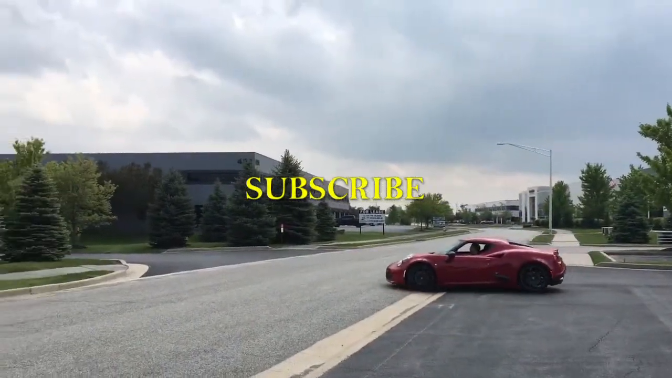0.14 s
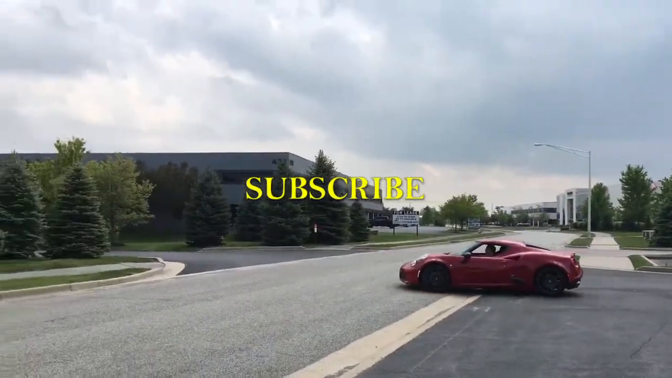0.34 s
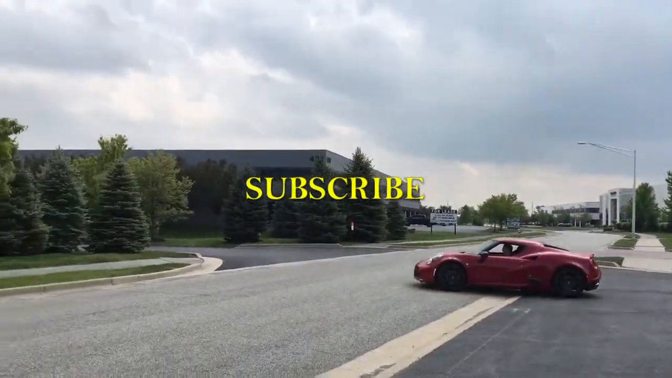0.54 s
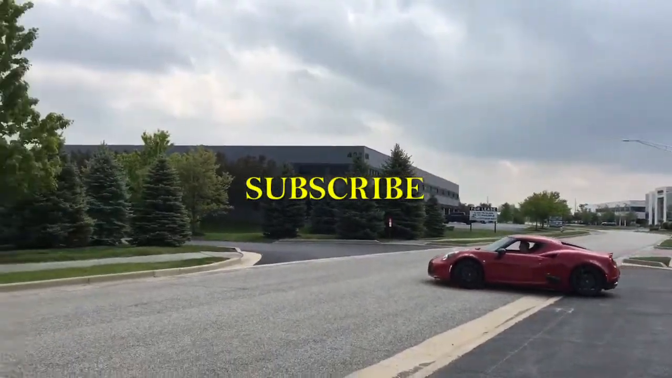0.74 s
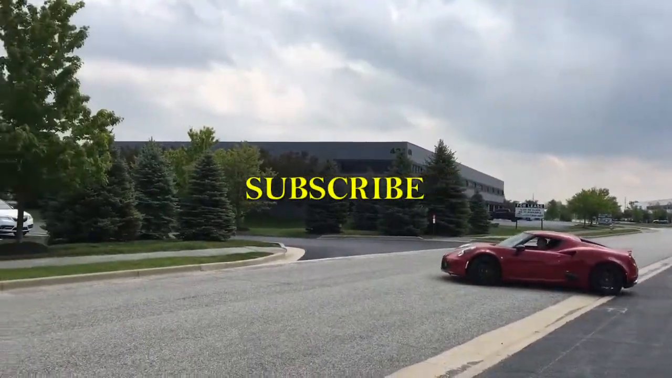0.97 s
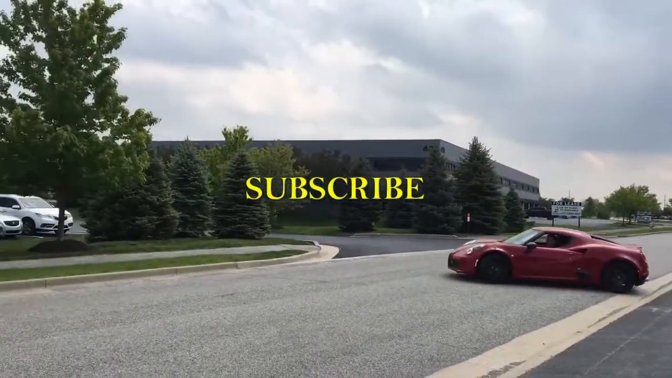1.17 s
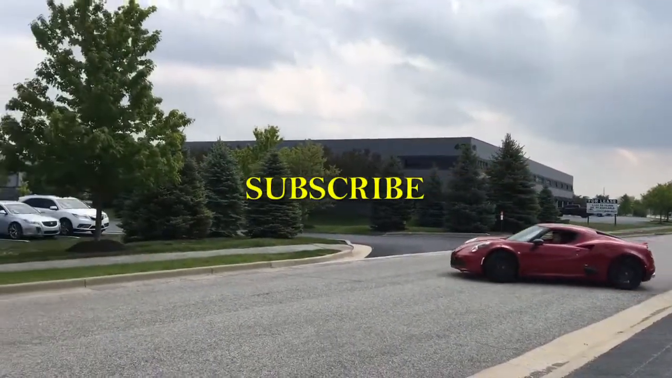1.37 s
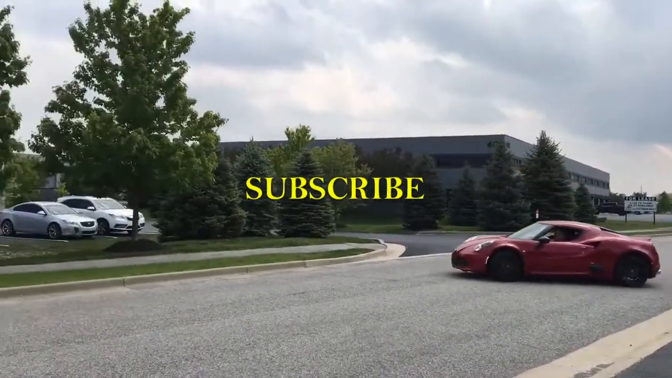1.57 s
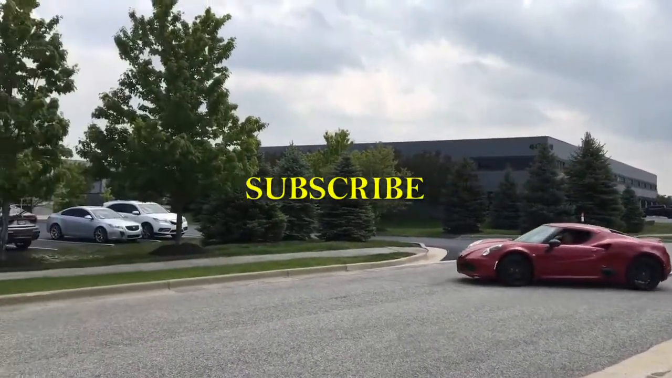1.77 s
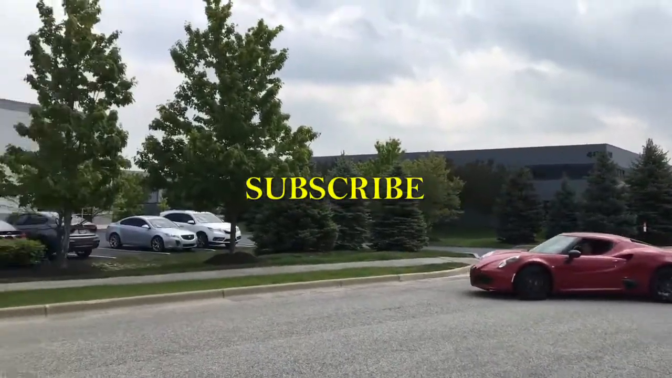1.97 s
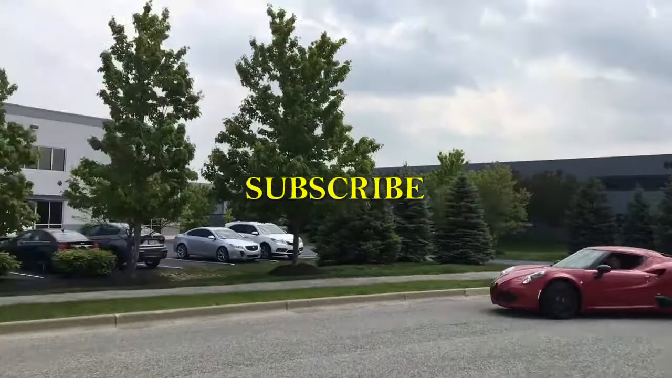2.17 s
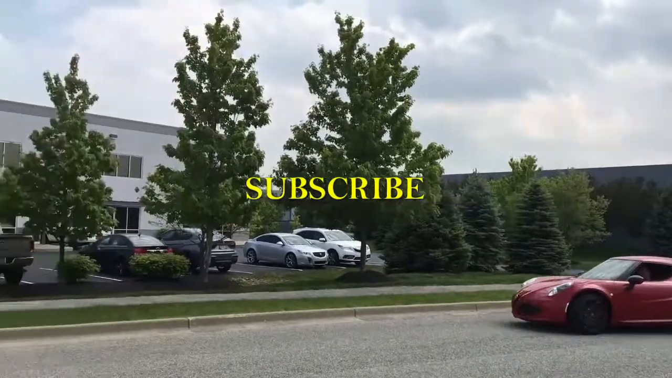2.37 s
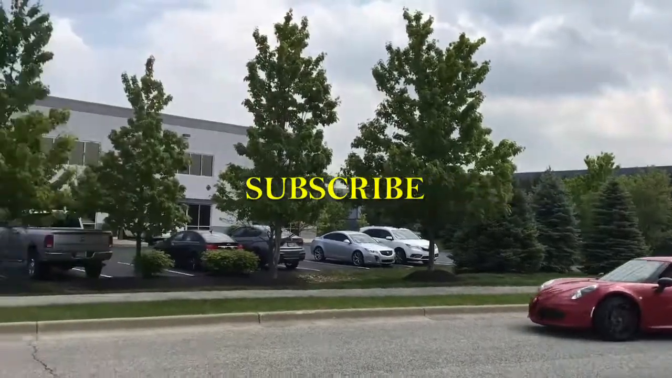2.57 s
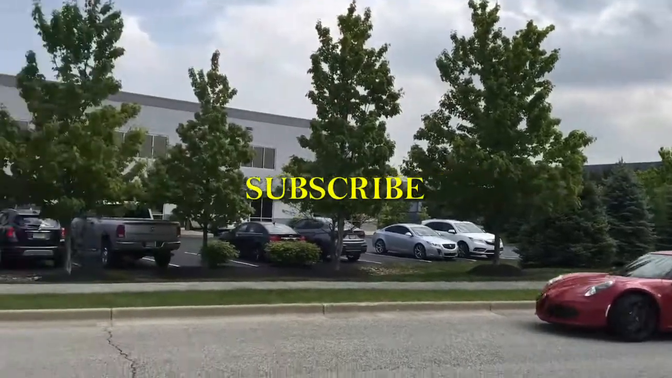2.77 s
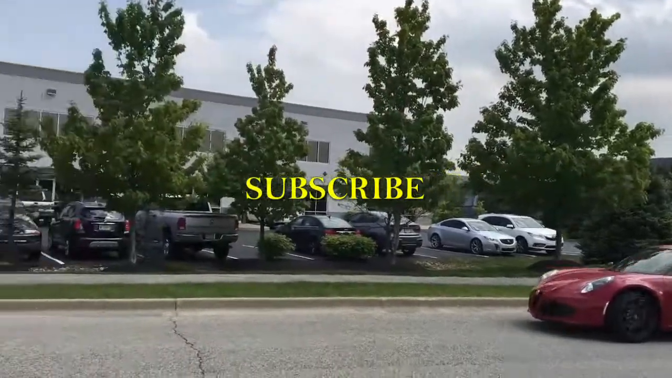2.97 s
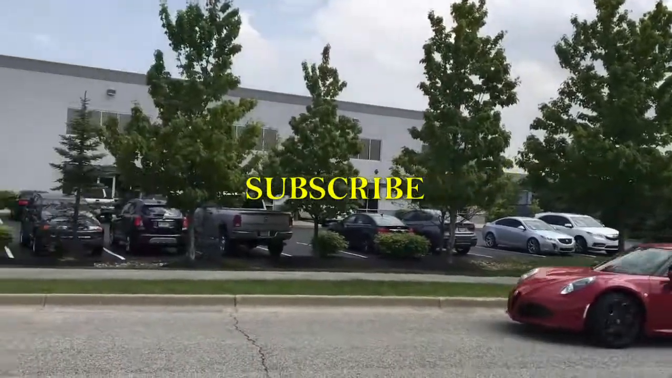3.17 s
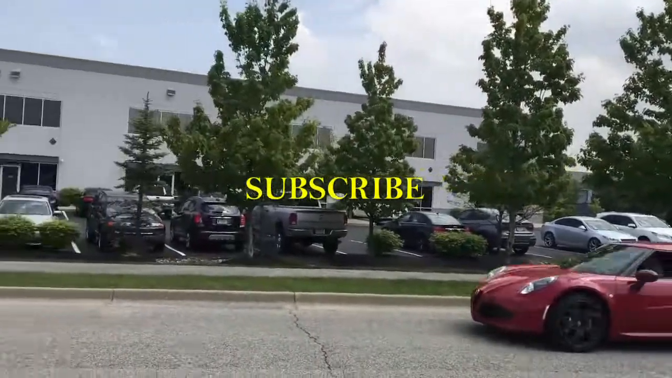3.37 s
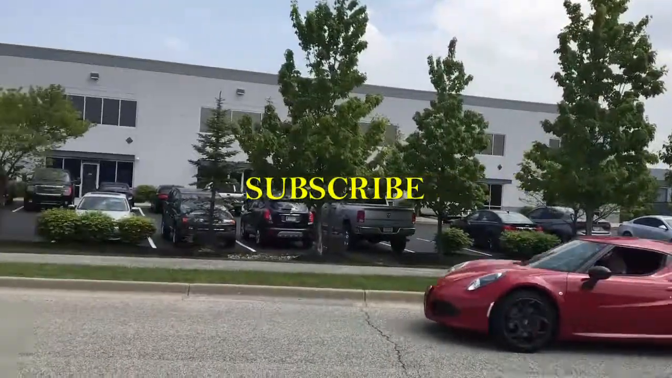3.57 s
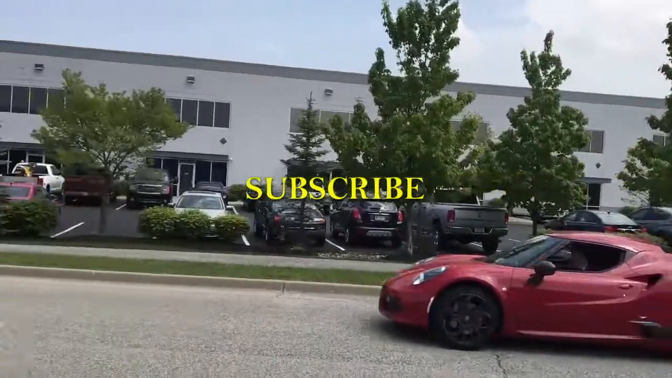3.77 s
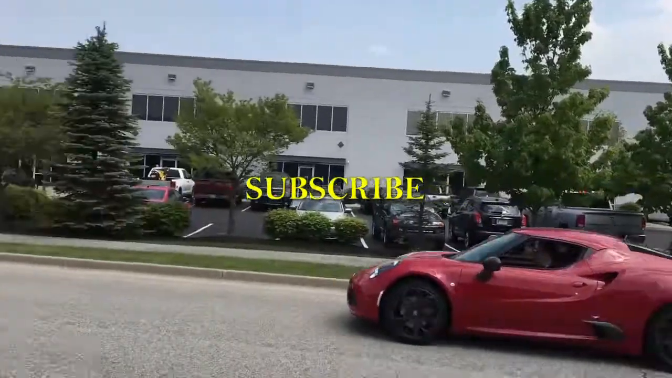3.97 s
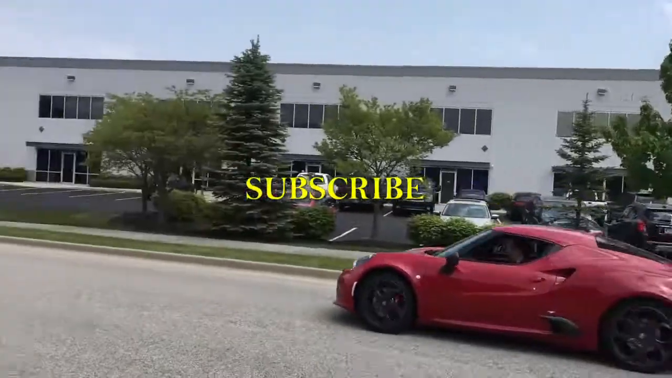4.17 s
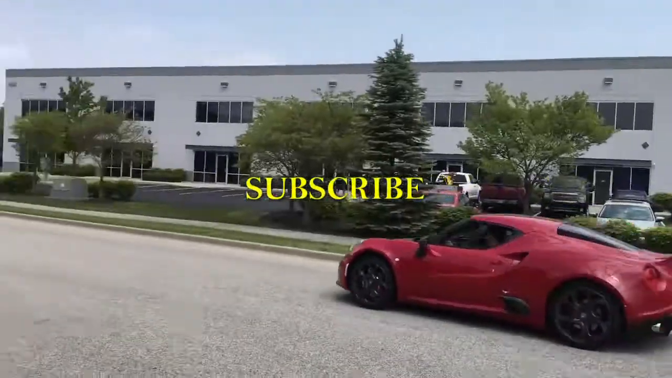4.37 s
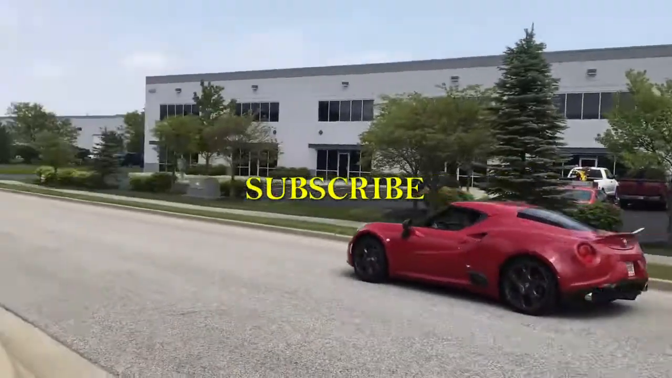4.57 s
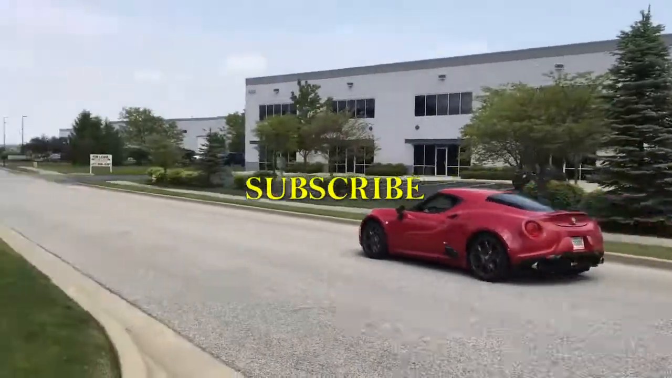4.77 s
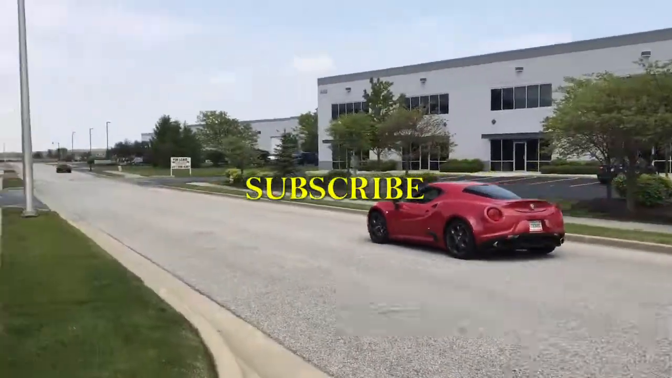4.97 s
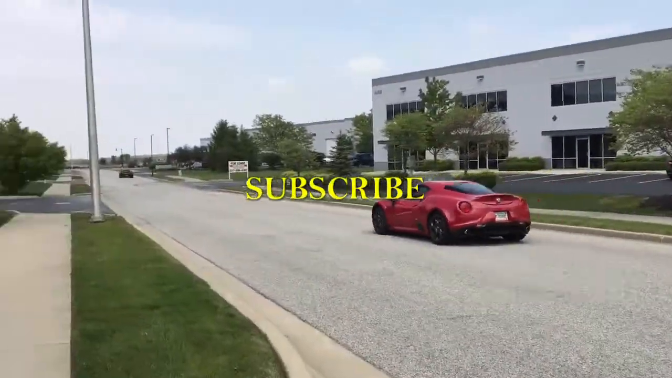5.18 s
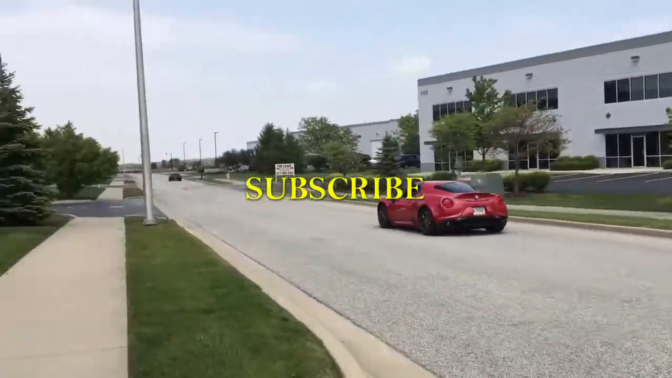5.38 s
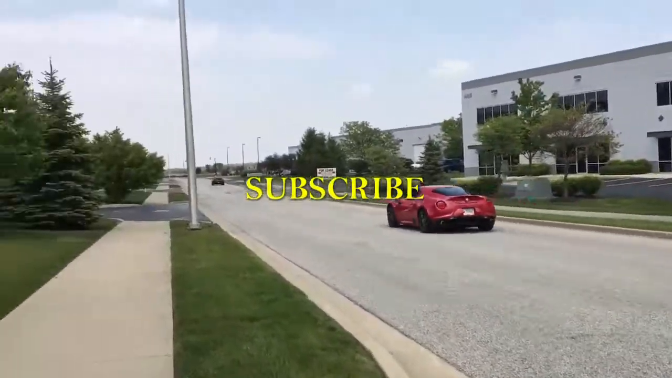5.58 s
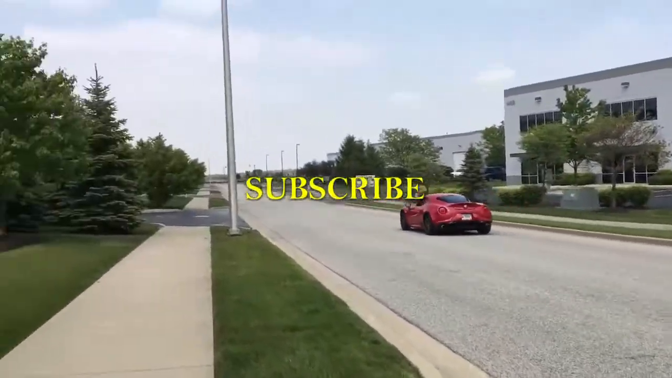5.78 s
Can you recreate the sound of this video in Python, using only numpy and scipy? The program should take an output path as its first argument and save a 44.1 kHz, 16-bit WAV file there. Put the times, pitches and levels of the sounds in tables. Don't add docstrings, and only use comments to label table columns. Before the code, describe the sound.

Outdoor roadside, handheld microphone, about six seconds. At first a sports car's low, lumpy four-cylinder burble sits at moderate distance, with a second car's wavering drone far down the road, throbbing most around 1.4-1.8 s and fading by about 4.5 s. A loose shield buzzes briefly near 0.7 s; a few tiny bright grit ticks snap at 1.15-1.3 s. The engine climbs steadily through first gear, growing smoother, with shell clatter, tyre roar and faint turbo whistle. From 3.5 s it swells abruptly, loudest and raspiest close by near 4 s. At 4.26 s the gear shift cuts in: a rough, half-speed stuttering bark with a low thump, falling in pitch and dying by 4.55 s. After a short dip, second gear pulls from about 4.8 s with airy turbo hiss and a rising, hoarse exhaust still going at the end. Building echoes slightly thicken it; low wind rumble peaks near 4.9 s, then calms.

```python
import sys
import numpy as np
from scipy import signal
from scipy.fft import rfft, irfft, next_fast_len
from scipy.io import wavfile
from scipy.ndimage import uniform_filter1d

SR = 44100
rng = np.random.default_rng(int(sys.argv[2]) if len(sys.argv) > 2 else 0)


def amplitude_ratio(level_db):
    exponent = np.asarray(level_db, float) / 20
    return 10 ** exponent


def put_to_file(sound):
    columns = np.atleast_2d(sound).T
    safe = np.clip(columns, -1, 1)
    whole_steps = np.round(safe * 32767)
    wavfile.write(sys.argv[1], SR, whole_steps.astype(np.int16))


N = 257103

# (frequency [Hz], level [dB])
PIPE = [(60, 0.5), (130, 0.5), (200, 0), (295, 7), (340, -4), (420, -3.5), (520, -1), (600, 4), (680, 0.5),
        (760, -23.5), (880, -17), (1040, -17.5), (1300, -26.5), (1900, -35.5)]
# (frequency [Hz], width [Hz], level [dB])
SHELL = [(878, 160, 2), (1057, 140, -3.5), (1173, 56, -3), (1329, 47, -2), (1416, 91, 0), (1590, 34, -1.5),
         (1883, 66, -3), (2077, 110, -2), (2338, 97, -6.5), (3166, 59, -23.5)]
CUT_S = 4.26
BOOST_S = 4.78


def evened(x):
    return x / np.sqrt(np.mean(abs(x) ** 2) + 1e-20)


def read(points, hz):
    f, value = np.transpose(points)
    return np.interp(np.log(hz + 1), np.log(f + 1), value)


def played(rows):
    s, *columns = np.transpose(rows)
    return [np.interp(np.arange(N) / SR, s, column) for column in columns]


def ramp(start, length):
    u = np.clip((np.arange(N) / SR - start) / length, 0, 1)
    return u * u * (3 - 2 * u)


def bump(s, length, size=1):
    return np.exp(-0.5 * ((np.arange(0, N, size) / SR - s) / length) ** 2)


def coloured(points, gate=1):
    size = next_fast_len(N)
    spectrum = rfft(gate * rng.standard_normal(N), size)
    spectrum *= amplitude_ratio(read(points, np.fft.rfftfreq(size, 1 / SR)))
    return evened(irfft(spectrum, size)[:N])


def drift(hz, count=N):
    rate = 400
    steps = int(N / SR * rate) + 2
    slow = signal.lfilter([1], [1, -np.exp(-2 * np.pi * hz / rate)], rng.standard_normal(steps))
    return evened(np.interp(np.linspace(0, steps - 1, count), np.arange(steps), slow))


def resonate(x, hz, width):
    turn = np.exp(2j * np.pi * np.cumsum(hz) / SR)
    r = np.exp(-np.pi * width / SR)
    return (turn * signal.lfilter([1], np.convolve([1, -r], [1, -r]), x / turn)).real


def air():
    # (time [s], level [dB])
    wind_level = [
        (0, -43),
        (2, -58),
        (2.9, -39),
        (3.3, -33),
        (4, -31.5),
        (4.6, -30.5),
        (4.9, -28.5),
        (5.2, -38.5),
        (5.83, -56),
    ]
    # (frequency [Hz], level [dB per Hz])
    gust_spectrum = [(18, -43), (33, -13.5), (55, 24), (90, 16.5), (200, 6.5), (400, -37.5)]
    # (frequency [Hz], level [dB per Hz])
    hum_spectrum = [(28, -34), (60, -15.5), (130, -11), (300, 8), (700, -10), (1800, -44), (4000, -65),
                    (9000, -58.5), (15500, -73.5)]
    wind = amplitude_ratio(played(wind_level)[0] + 1.0 * drift(14.0)) * coloured(gust_spectrum)
    return wind + amplitude_ratio(-41.5 + 0.59 * drift(2.4)) * coloured(hum_spectrum)


def far_car():
    # (time [s], speed [firings per s], level [dB])
    far_engine = [
        (0, 116, -22.5),
        (.6, 127, -37),
        (1.05, 125, -28.5),
        (1.3, 125, -28),
        (1.78, 135, -33),
        (1.92, 127, -28.5),
        (2.5, 119.5, -33.5),
        (2.7, 117, -29.5),
        (4.1, 108, -39),
    ]
    # (time [s], peak level [dB])
    throbs = [
        (.11, -21),
        (.56, -21),
        (1.387, -19),
        (1.57, -18),
        (1.743, -18),
    ]
    hz, db = played(far_engine)
    turns, t = np.cumsum(hz) / SR, np.arange(N) / SR
    level = amplitude_ratio(db + 3.8 * drift(8.7)) * (1 - ramp(4.07, 0.44))
    throb = sum(amplitude_ratio(peak_db) * bump(s, 0.045) for s, peak_db in throbs)
    first = np.maximum(level, throb) * np.cos(2 * np.pi * turns + 0.34 * drift(6.9))
    second = level * amplitude_ratio(-9 - 5.4 * t) * np.cos(4 * np.pi * turns + 0.71 * drift(8.8))
    return np.sqrt(2) * (first + second)


def grit():
    # (time [s], peak level [dB], frequency [Hz])
    ticks = [
        (1.1473, -48, 7100),
        (1.166, -38, 6070),
        (1.1867, -39, 5870),
        (1.194, -45, 6150),
        (1.2014, -37, 4510),
        (1.259, -39, 6740),
        (1.263, -36.5, 6900),
        (1.2945, -37.5, 4580),
    ]
    out, t = np.zeros(N), np.arange(200) / SR
    for s, db, hz in ticks:
        tick = np.sin(2 * np.pi * hz * t) + 0.52 * np.sin(2 * np.pi * 1.3 * hz * t)
        out[round(s * SR):][:200] += amplitude_ratio(db + 2.3) * tick * np.exp(-t / 0.00035)
    return out


def cut():
    return ramp(CUT_S, 0.019) - ramp(4.55, 0.04)


def tail_turn():
    return ramp(4.537, 0.15)


def ring(hz, width):
    mode = signal.iirpeak(hz, hz / width, SR)
    return evened(signal.lfilter(*mode, signal.lfilter(*mode, rng.standard_normal(N))))


def rattle():
    # (time [s], length [s], level [dB], frequency [Hz])
    buzzes = [
        (0.702, 0.028, -39.5, 1690),
        (0.737, 0.022, -42.5, 1500),
        (0.774, 0.046, -38.5, 1850),
        (1.064, .03, -50, 1890),
    ]
    # (time [s], length [s], level [dB])
    hums = [
        (3.4, 0.14, -32.5),
        (4.75, .15, -29),
    ]
    out = amplitude_ratio(-66 + 4.3 * drift(3.0)) * ring(3185, 45)
    out += sum(amplitude_ratio(db) * bump(s, length) for s, length, db in hums) * ring(630, 90)
    for s, length, db, hz in buzzes:
        out += amplitude_ratio(db) * (ramp(s, 0.004) - ramp(s + 0.24 * length, length)) * ring(hz, 420)
    return out


def whistle(turbo_db):
    # (start [s], end [s], from [Hz], to [Hz], level against the hiss [dB])
    spools = [
        (2.75, 4.36, 5100, 8600, -18),
        (4.76, 5.65, 4050, 5150, -14),
    ]
    out = 0
    for start, end, from_hz, to_hz, db in spools:
        hz = from_hz + (to_hz - from_hz) * ramp(start, end - start)
        tone = evened(resonate(rng.standard_normal(N), hz, width=330)) * amplitude_ratio(2 * drift(12.0))
        octave = evened(resonate(rng.standard_normal(N), 2 * hz, width=2200))
        octave *= tail_turn() * amplitude_ratio(-11 + 5.1 * drift(25.0))
        level = amplitude_ratio(turbo_db + db + 4.0 * (1 - ramp(start, 0.9 * (end - start))))
        out = out + level * (ramp(start, 0.08) - ramp(end - 0.1, 0.089)) * (tone + octave)
    return out


def clatter(gate):
    knocks, out = gate * rng.standard_normal(N), 0
    for hz, width, db in SHELL:
        mode = signal.iirpeak(hz, hz / (2.12 * width), SR)
        rung = signal.lfilter(*mode, signal.lfilter(*mode, knocks))
        out = out + amplitude_ratio(db + 2.36 * drift(3.0)) * evened(rung)
    return evened(out)


def uneven(hz):
    def law(start, db, slope):
        return db + slope * np.maximum(hz - start, 0)
    shift = cut()
    half_db, rough_db = law(75.5, -6.5, -0.26), law(112, -12.5, -0.16)
    half_db = half_db + shift * (0 - half_db)
    rough_db = rough_db + shift * (-10.5 - rough_db)
    bright_db = np.minimum(law(56, -6.5, 0.23), 8.0) + 7.5 * shift * (1 - ramp(CUT_S, 0.16))
    return half_db, rough_db, bright_db, law(60, 6.93, -0.11)


def puffs(turns, half_db, length, spread_db):
    index = turns.astype(int)
    size = amplitude_ratio(spread_db * np.clip(rng.standard_normal(2000), -1.7, 1.7))
    missing = np.clip(2 * amplitude_ratio(half_db) / (1 + amplitude_ratio(half_db)), 0, 1)
    every = size[index] * np.exp(-(turns % 1) / length)
    other = size[index // 2] * np.exp(-(turns % 2) / (2.1 * length))
    return uniform_filter1d((1 - missing) * every + missing * other, size=12)


def pipe_lag():
    log_gain = np.log(amplitude_ratio(np.maximum(read(PIPE, np.arange(1025) * 5.), -50)))
    return -signal.hilbert(np.r_[log_gain, log_gain[-2:0:-1]]).imag[:1025]


def order_levels(hz, orders, low_db, upper_db, bay_db):
    # (frequency [Hz], level [dB])
    boom = [(50, -3.5), (120, -2), (200, -3.5), (240, 4.5), (260, -3), (292, 1.5), (335, -4), (460, -11.5)]
    # (time [s], order, level [dB])
    fades = [(.55, 1, -5), (.8, 1, 8.5), (1.01, 1, -9), (2.42, 1, 6.5), (2.64, 1, -13), (3.07, 1, 2),
             (3.3, 1, -13), (4.18, 1, -8.5), (.26, 2, -5), (2.62, 2, -2), (.55, 3, -14), (2.38, 3, -7),
             (2.68, 3, 4.5), (2.9, 3, -8), (3.08, 3, 0.5), (3.3, 3, -7), (3.88, 3, -4.5), (1.075, 4, -12.5),
             (5.325, 5, -7.5), (3.863, 5, 3), (0.35, 6, -11), (4.18, 6, 0.5), (4.52, 8, 3.5), (3.9, 8, 6.5),
             (6.3, 9, 12), (6.4, 10, 25), (5.42, 7, 4), (5.72, 8, 10), (.05, 6, -6), (3.017, 7, 7.5)]
    step = slice(None, None, 64)
    half_db, _, bright_db, boom_db = [db[step] for db in uneven(hz)]
    low_db, upper_db, bay_db = low_db[step], upper_db[step], bay_db[step]
    order_hz = orders * hz[step]
    modes = sum(amplitude_ratio(db) / (1 + (2 * (order_hz - f) / width) ** 2) for f, width, db in SHELL[:7])
    tops = amplitude_ratio(read(PIPE, order_hz) + half_db * (orders % 1 > 0) + boom_db * (order_hz < 350))
    bright = 0.74 * (0.65 + modes) * amplitude_ratio(bright_db + bay_db - upper_db)
    tops *= np.where(order_hz > 770, bright, 1)
    band = (order_hz > 450) & (order_hz < 750)
    smooth = uniform_filter1d((tops ** 2 * band).sum(0), size=100)
    tops *= amplitude_ratio(upper_db - 0.8) / np.sqrt(smooth)
    shift, rear = cut()[step], tail_turn()[step]
    for k in range(6):
        db = low_db + read(boom, order_hz[2 * k]) + 10.5 * rear * (k == 0)
        db += 1.33 * (1 - rear) * drift(3.7, count=len(db)) - 3 * (k > 2)
        below = 1 if k < 3 else np.clip((330 - order_hz[2 * k]) / 50, 0, 1)
        tops[2 * k] += (1 - shift) * below * (amplitude_ratio(db) - tops[2 * k])
    for s, order, db in fades:
        length = 0.068 * (1 + 0.5 * (order > 3.5))
        tops[2 * round(order) - 2] *= amplitude_ratio(db * bump(s, length, size=64))
    return tops, order_hz


def exhaust(hz, turns, low_db, upper_db, bay_db, load):
    half_db, rough_db, _, boom_db = uneven(hz)
    orders = np.arange(2, 44)[:, None] / 2
    tops, order_hz = order_levels(hz, orders, low_db, upper_db, bay_db)
    lag, near = pipe_lag(), load[::64]
    t, knots = np.arange(0, N, 4), np.arange(0, N, 64)
    out = np.zeros(len(t))
    beat = (2 * np.pi * turns + 0.084 * amplitude_ratio(rough_db) * drift(3.8))[t]
    for k, top, f in zip(orders[:, 0], tops, order_hz):
        scatter = np.pi * rng.uniform(-0.98, 1) * (1 - near)
        phase = np.interp(t, knots, scatter + np.interp(f / 5, np.arange(1025), lag))
        waver_db = 3.5 * (1.15 - near + 0.6 * (f > 770)) * (f > 330)
        top = top * amplitude_ratio(waver_db * drift(4.0, count=len(knots)))
        out += np.interp(t, knots, top) * np.cos(k * beat + phase)
    roar = coloured(PIPE, 0.37 + puffs(turns, half_db, length=0.49, spread_db=8.0))
    roar += (0.72 * amplitude_ratio(boom_db) - 1) * signal.lfilter(*signal.butter(2, 350, fs=SR), roar)
    roar = signal.lfilter(*signal.butter(2, 6000, fs=SR), roar)
    tones = np.sqrt(2) * signal.resample_poly(out, up=4, down=1)[:N]
    return tones + amplitude_ratio(upper_db + rough_db + 6.5) * roar


def turbo_hiss(gate, turbo_db):
    # (frequency [Hz], level [dB per Hz])
    hiss_spectrum = [(2650, -23), (4500, 0.5), (4860, -4.5), (5370, -1.5), (6510, -3), (7560, -7.5),
                     (8610, -9), (9600, -12), (10400, -20), (13200, -22.5), (15600, -32)]
    rear = tail_turn()
    hiss = coloured(hiss_spectrum, gate)
    hiss += 0.55 * rear * (signal.lfilter(*signal.iirnotch(7780, 3.0, SR), hiss) - hiss)
    dull = signal.lfilter(*signal.butter(1, 7000, fs=SR), hiss)
    hiss -= np.clip(0.5 - 0.35 * rear, 0, 1) * (hiss - dull)
    return amplitude_ratio(turbo_db + 0.2 + 0.88 * drift(11.0) + 2.0 * rear * drift(22.0)) * hiss


def near_car():
    # (time [s], speed [firings per s])
    revs = [(0, 50), (.41, 49.6), (.66, 54), (.97, 58.7), (1.3, 63), (1.8, 70), (2.37, 83), (2.55, 81.7),
            (3.07, 96.8), (3.54, 119.3), (3.96, 144.5), (4.17, 153.5), (4.25, 153.3), (4.4, 136.4),
            (4.53, 113), (4.65, 102.3), (4.87, 108.2), (5.83, 131)]
    # (time [s], exhaust bark [dB], exhaust boom [dB], engine-bay noise [dB])
    engine = [(0, -39.5, -27, -37.5), (.6, -40.5, -30.5, -38), (.9, -36.5, -31, -37.5),
              (1.3, -37.5, -27.5, -36.5), (2.2, -31.5, -27, -34.5), (2.47, -29, -28, -32),
              (2.6, -32.5, -29.5, -35.5), (3.07, -29.5, -26, -29.5), (3.5, -34, -28, -29),
              (3.72, -17, -17, -24.5), (3.95, -12.5, -13, -21.5), (4.2, -17.5, -16, -24.5),
              (4.56, -33, -32, -35), (4.72, -34, -30, -30), (4.87, -26, -24.5, -26.5),
              (5.39, -28, -22.5, -23.5), (5.6, -22, -24.5, -25.5), (5.83, -18, -23.5, -26.5)]
    # (frequency [Hz], level [dB per Hz])
    tyres = [(600, 4), (820, -11), (1100, 3), (1400, -11), (1700, -8), (2100, -2), (2400, -13),
             (2750, -14.5), (3300, -60)]
    # (frequency [Hz], level [dB per Hz])
    rasp = [(2000, -24.5), (2700, -2.5), (3000, 1.5), (3250, 4), (3550, -0.5), (4000, 0), (4500, -3.5),
            (4900, -35), (6000, -51)]
    hz, (upper_db, low_db, bay_db) = played(revs)[0], played(engine)
    since, rear = np.arange(N) / SR - CUT_S, tail_turn()
    shift = ramp(CUT_S, 0.061) - ramp(4.46, 0.071)
    upper_db = upper_db + shift * (-8.5 - 45 * since - upper_db)
    bay_db = bay_db + shift * (-18.5 - 16.5 * since - bay_db)
    turns = 0.4064 + np.cumsum(hz) / SR
    load = np.clip((upper_db + 35) / 22, 0, 1)
    out = exhaust(hz, turns, low_db, upper_db, bay_db, load)
    thump = amplitude_ratio(-15.5 - 5.5 * (since / 0.27) ** 2) * cut()
    out += np.sqrt(2) * thump * np.cos(np.pi * turns + 1.2)
    flow_db = 1.51 * (bay_db + 37)
    rasp_db = -55 + flow_db - 3.5 * ramp(BOOST_S, 0.35)
    rasp_db += 4 * bump(4.0, 0.054)
    boost = ramp(BOOST_S, 0.062) - ramp(5.32 - 0.15, 0.27)
    turbo_db = -59.5 + flow_db + 1.5 * rear + 5.5 * boost
    turbo_db += -5 * shift * (1 - ramp(CUT_S, 0.11))
    out += whistle(turbo_db) + rattle()
    half_db = uneven(hz)[0]

    def gate(depth, length, spread_db):
        flow = 0.48 + depth * load * (1 + 1.3 * shift) * puffs(turns, half_db, length, spread_db)
        return flow / np.sqrt(uniform_filter1d(flow ** 2, size=3000))

    out += amplitude_ratio(bay_db - 7) * clatter(gate(0.59, 0.4, 4.8))
    out += amplitude_ratio(bay_db - 5.5 - 6.8 * load + 0.59 * drift(6.5)) * coloured(tyres, gate(0.52, 0.38, 2.0))
    out += amplitude_ratio(rasp_db - 1.65 + 0.27 * drift(11.0)) * coloured(rasp, gate(4.8, 0.34, 2.0))
    tip = resonate(gate(4.9, 0.17, 3.5) * rng.standard_normal(N), np.full(N, 2400.), width=330)
    out += load * amplitude_ratio(rasp_db - 4.5) * evened(tip)
    return out + turbo_hiss(gate(1.5, 0.32, 1.8), turbo_db)


def scene():
    # (delay [s], level [dB])
    wall = [
        (.004, 0.5),
        (0.032, -3.5),
        (.12, -16.5),
        (.19, 0),
    ]
    car = -near_car()
    echoes = sum(amplitude_ratio(db - 19.0) * np.r_[np.zeros(round(s * SR)), car][:N] for s, db in wall)
    return (car + echoes + far_car() + grit() + air())[None]


def band_limit(x):
    return signal.sosfilt(signal.butter(12, 15710, fs=SR, output="sos"), x)


def record(dry):
    knee = 1.02
    settling = np.minimum(np.arange(N) / (0.006 * SR), 1)
    dry = signal.lfilter(*signal.butter(2, 30, 'high', fs=SR), dry)
    limited = knee * np.tanh(settling * dry / knee)
    dull = signal.lfilter(*signal.butter(2, 14500, fs=SR), limited)
    return band_limit(dull)


dry = scene()
out = record(dry)
put_to_file(out)
```